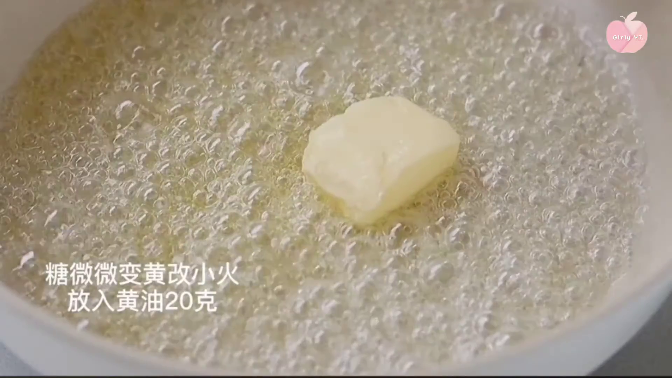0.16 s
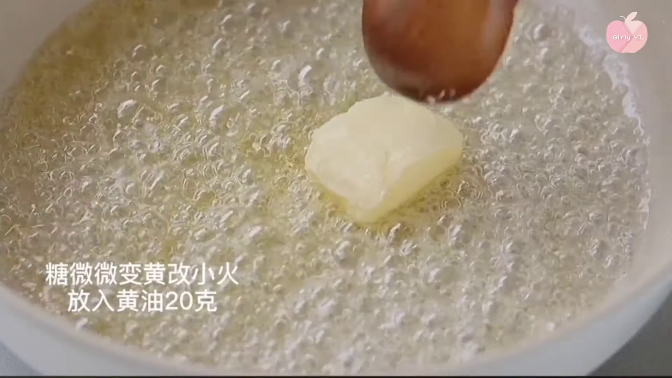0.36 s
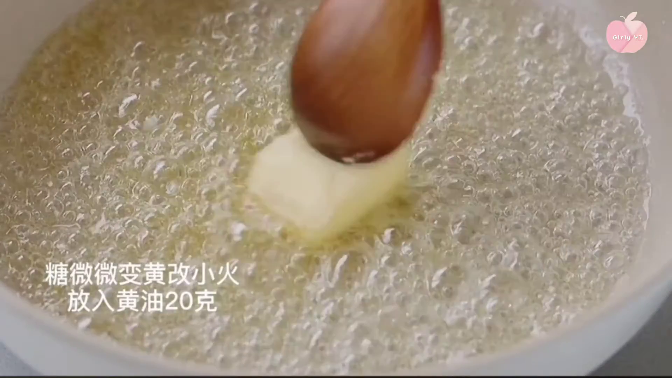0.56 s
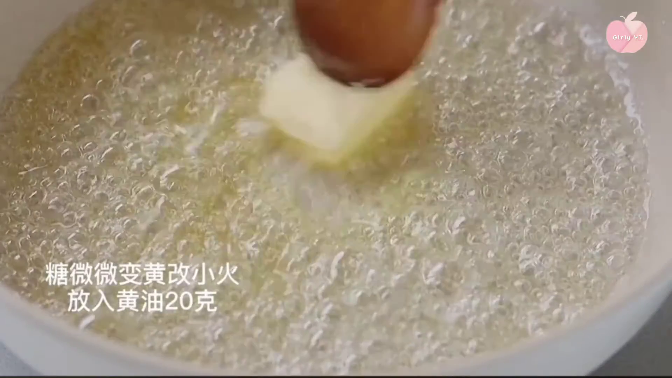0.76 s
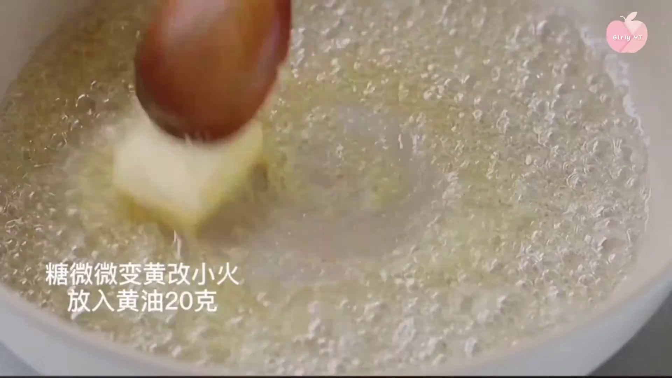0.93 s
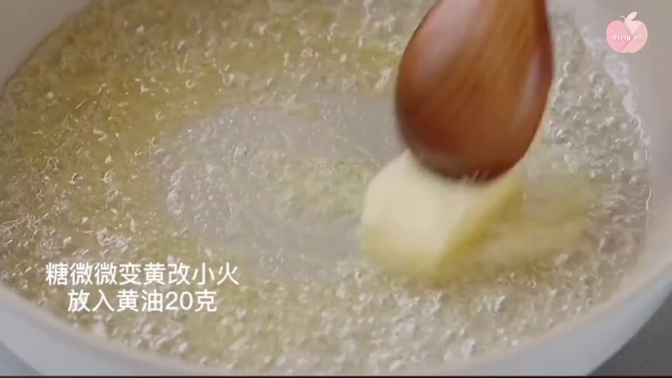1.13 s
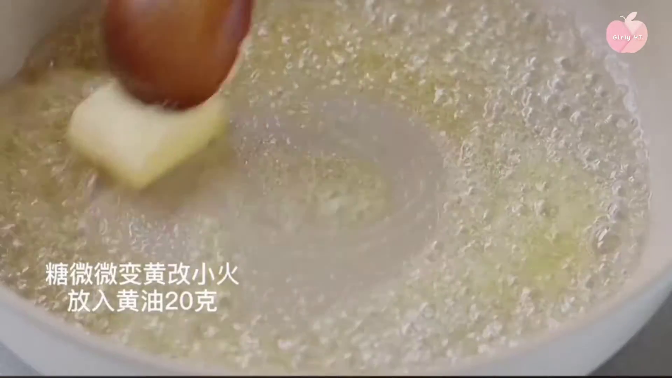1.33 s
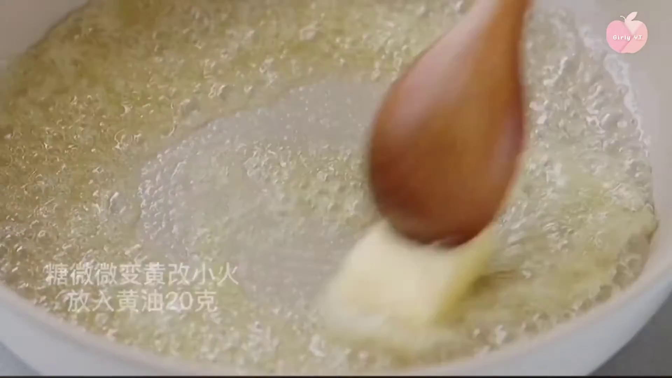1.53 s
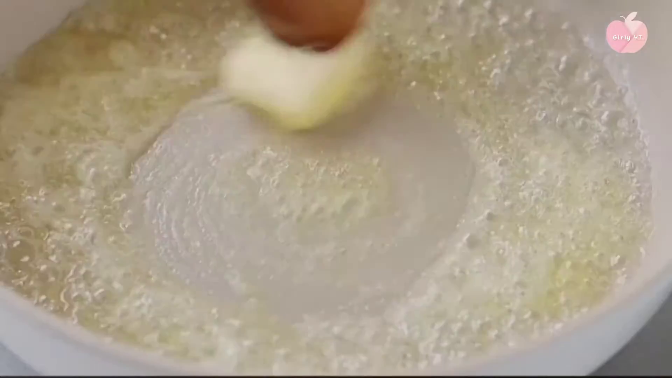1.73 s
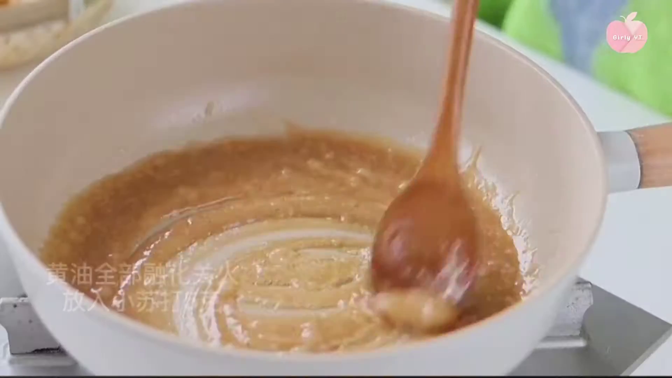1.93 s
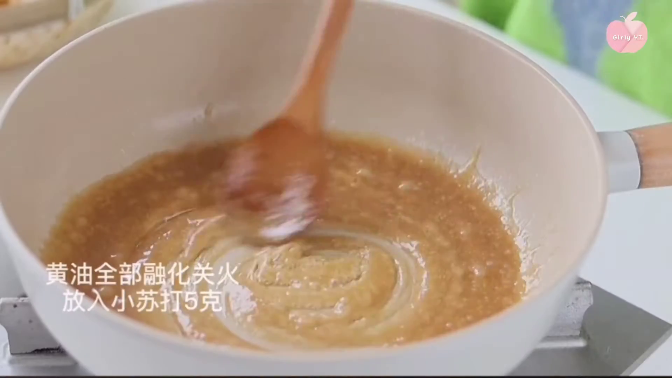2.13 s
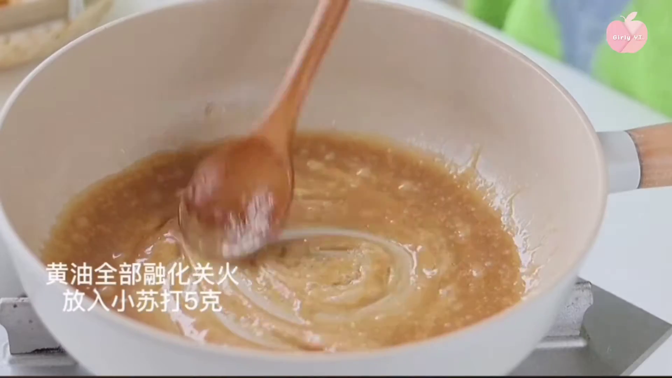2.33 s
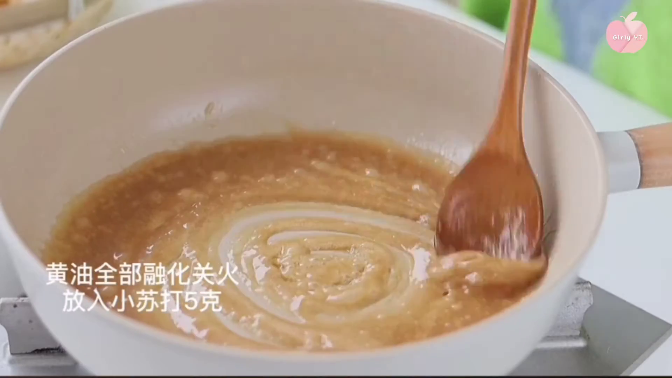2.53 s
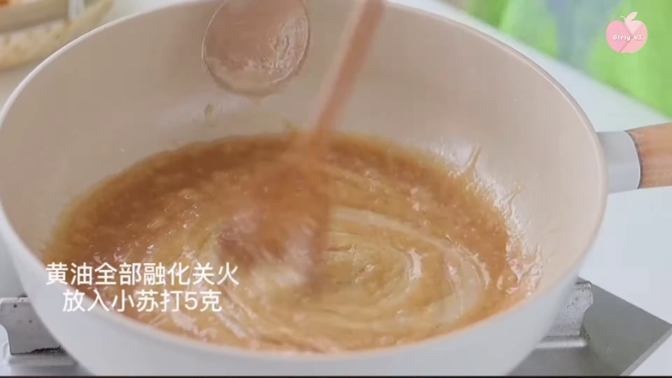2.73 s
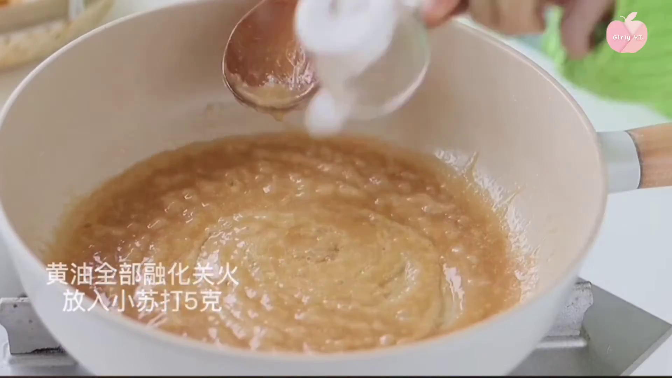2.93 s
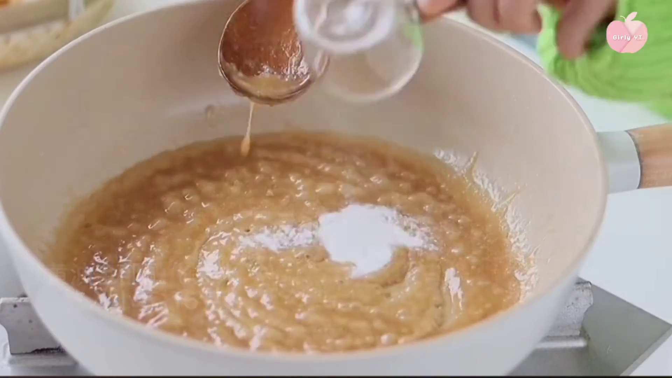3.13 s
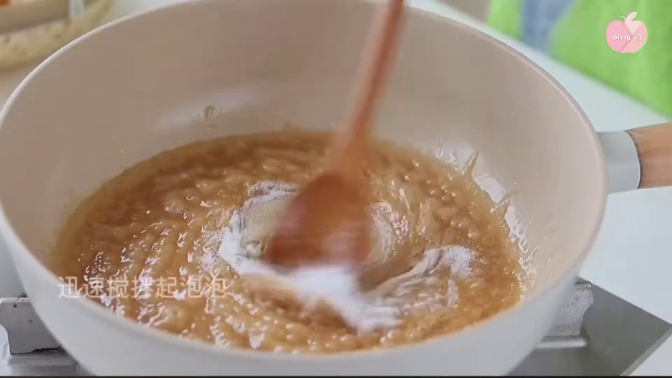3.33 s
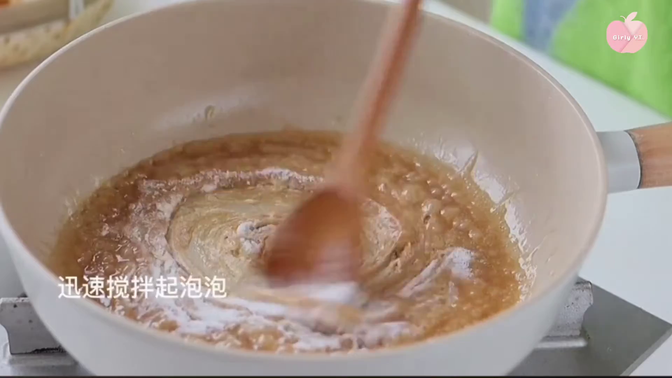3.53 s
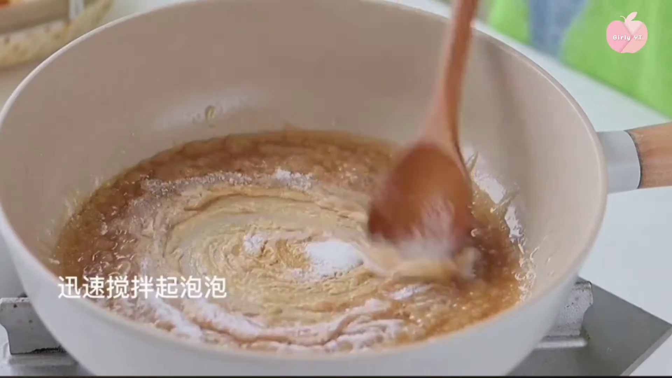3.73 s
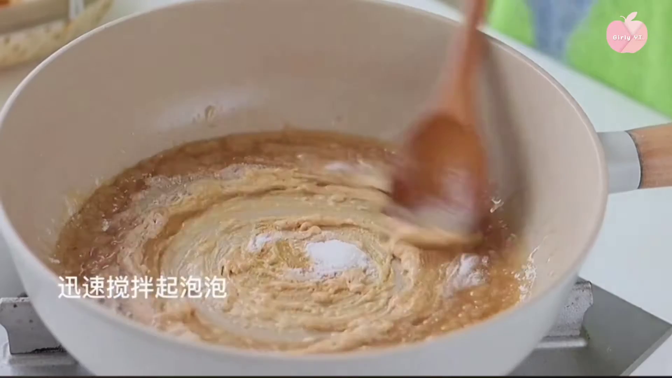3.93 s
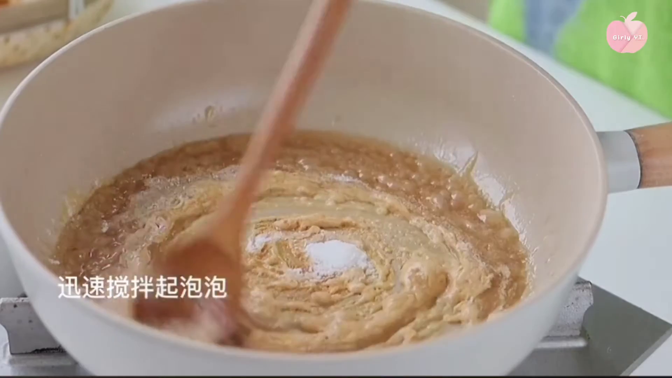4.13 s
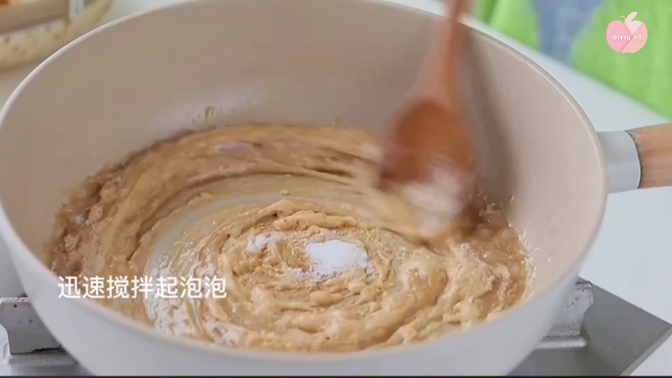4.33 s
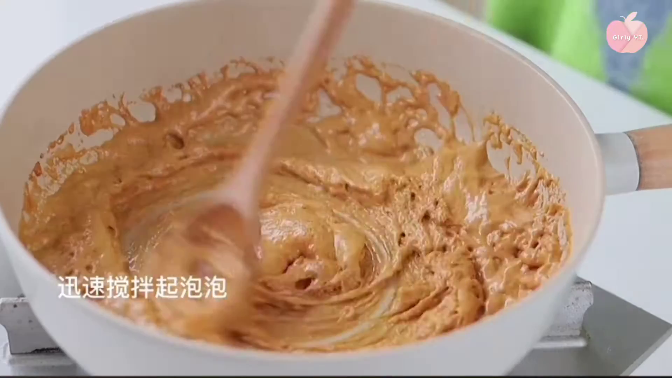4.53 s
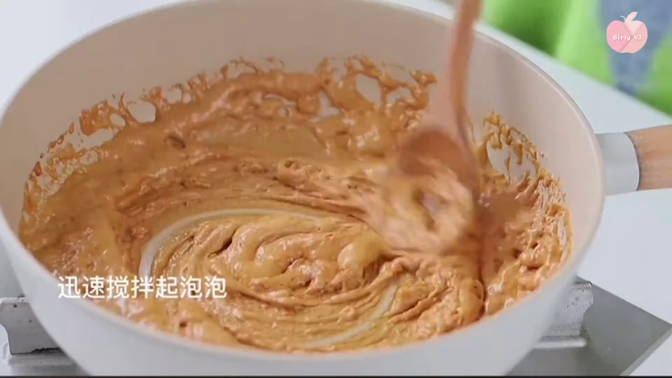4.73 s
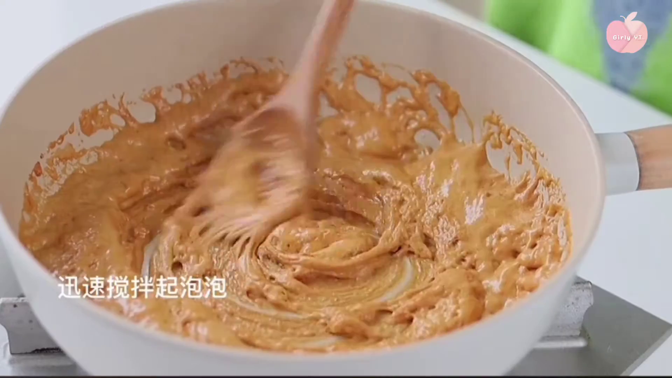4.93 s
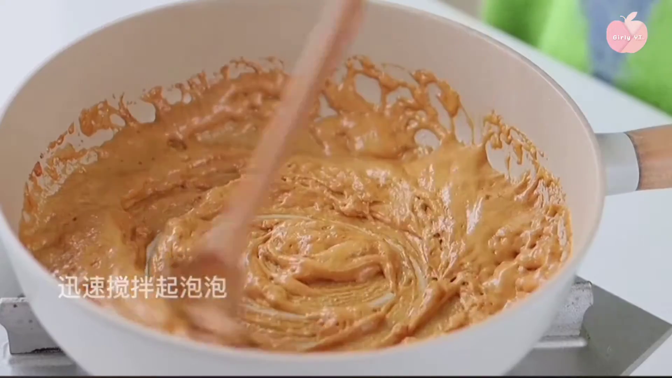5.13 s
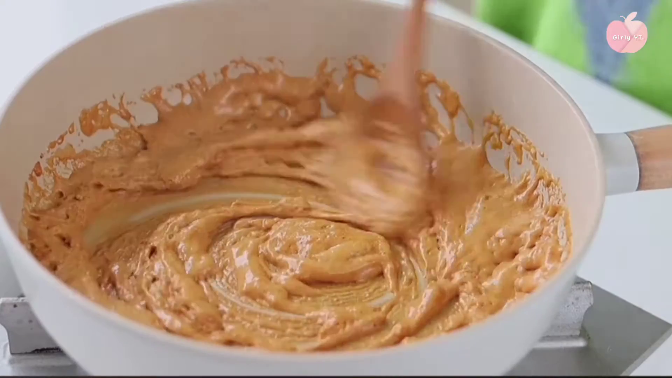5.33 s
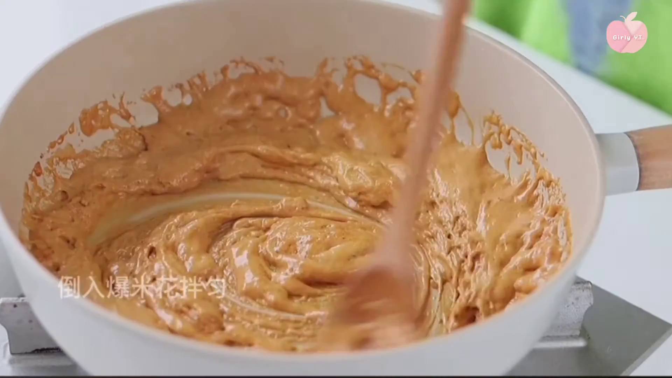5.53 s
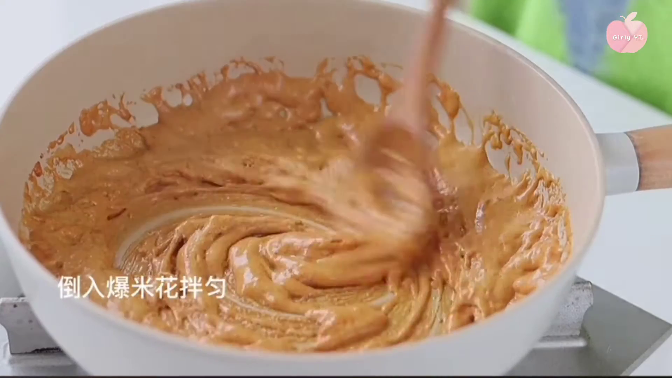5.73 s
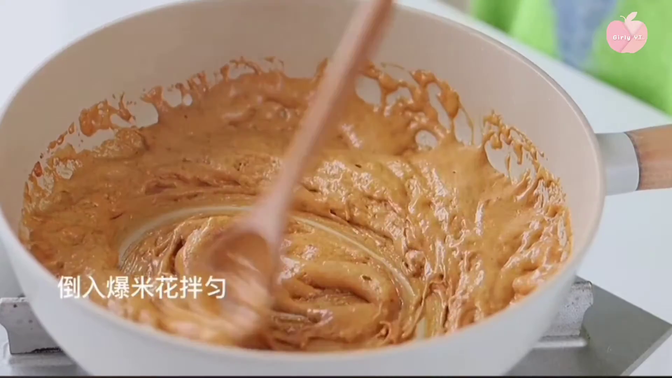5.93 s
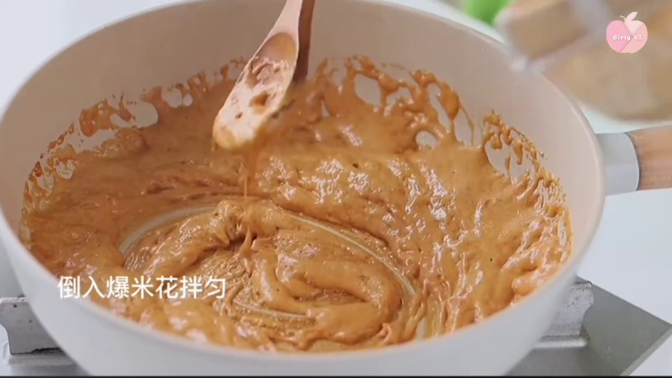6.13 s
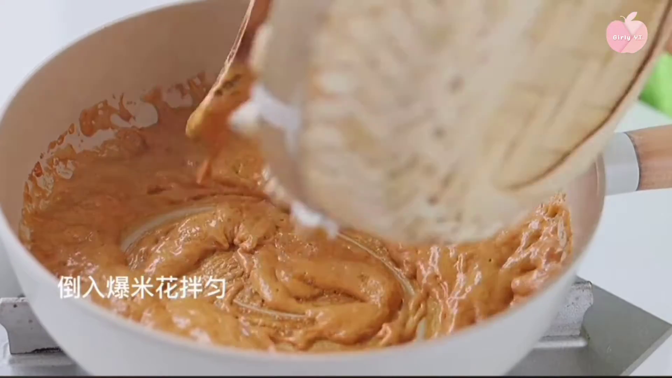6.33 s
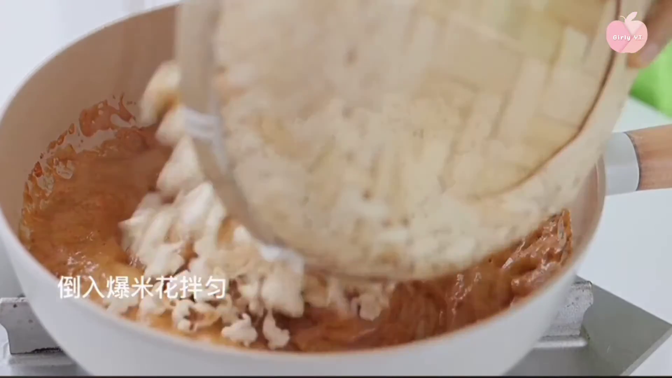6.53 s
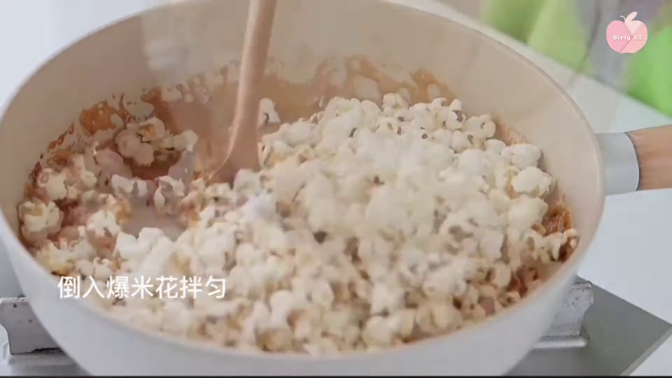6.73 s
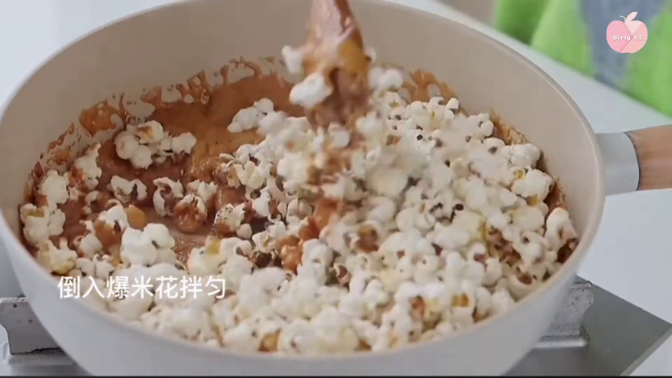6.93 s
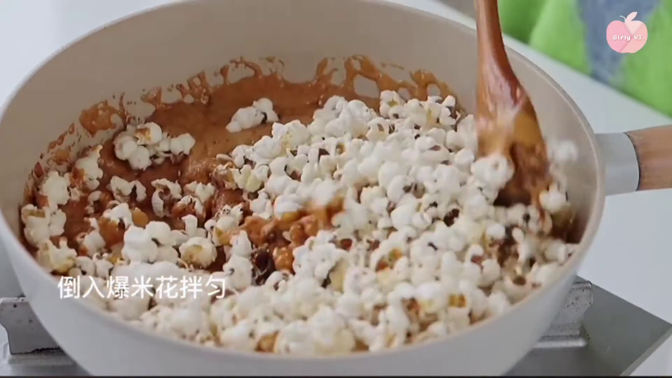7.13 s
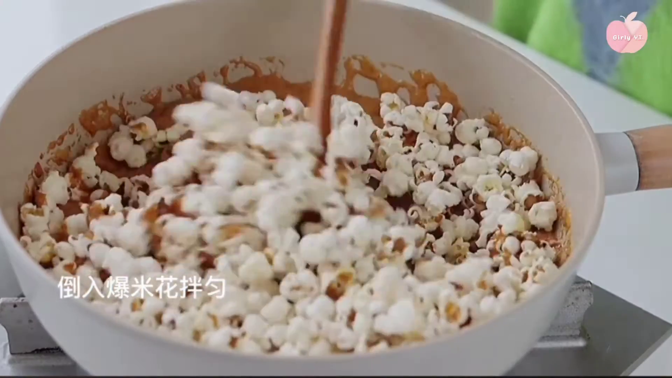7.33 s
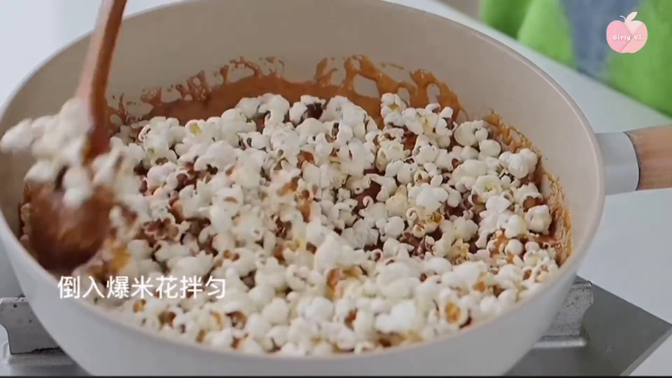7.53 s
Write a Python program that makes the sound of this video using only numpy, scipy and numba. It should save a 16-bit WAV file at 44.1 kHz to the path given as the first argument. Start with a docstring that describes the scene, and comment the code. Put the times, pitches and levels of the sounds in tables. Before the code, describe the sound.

Close kitchen sounds: faint bubbling, a bright butter sizzle cut short, brisk wooden spoon scrapes and taps, then dry popcorn tumbling into the pan.

```python
"""Caramel is cooked in an enamelled pan in a quiet kitchen, heard from close by.
First sugar bubbles swell, a wooden spoon rubs and knocks, and butter sizzles, gulps, then stops short.
Next the spoon scrapes in many short strokes, with a faint squeak near the end; then popcorn is tipped
in with a rush and stirred. A faint simmer, room noise, microphone hiss and a hum lie below.
Clicks that set tones ringing make the sizzle, strokes, popcorn and simmer; decaying sines with noise
make spits, knocks and kernels, sinking sines the gulps; the squeak glides, the room is noise with a hum."""
import sys
import numpy as np
from scipy import signal
from scipy.fft import rfft, irfft
from scipy.io import wavfile
from numba import njit

SR = 44100
rng = np.random.default_rng(int(sys.argv[2]) if len(sys.argv) > 2 else 0)


def master(y):
    """Save y as 16-bit WAV."""
    cut = np.clip(np.atleast_2d(y).T, -1, 1)
    pcm = np.round(cut * 32767)  # scale
    wavfile.write(sys.argv[1], SR, pcm.astype(np.int16))


N = 338688  # length in samples
SPLIT_HZ = 3400  # border between the low and the high part of a grainy sound


# Butter pushed round in the sugar. Each row: time in seconds, large bubbles in dB, fine spit in dB.
SIZZLE_LEVELS = [(.77, -72, -65), (.8, -53.5, -52.5), (.88, -56, -45), (1.0, -41.5, -46.5),
                 (1.06, -49, -44), (1.22, -50.5, -45.5), (1.28, -44.5, -41), (1.53, -51, -44.5),
                 (2.0, -52.5, -46)]
# First flares of the butter. Each row: bite (loudest moment) in seconds, swell before it in seconds,
# hold after it in seconds, large bubbles in dB, fine spit in dB.
BUTTER_FLARES = [(.01, 0.072, 0.19, -55, -61.5), (.5, 0.015, .08, -74, -67), (.74, 0.11, 0.011, -74, -64)]
# Colour of the sizzle. Each row: pitch in Hz, relative level in dB per Hz.
SIZZLE_COLOUR = [(290, -8), (500, -61), (1200, -22), (1650, -7), (2070, 4), (2540, 0.5), (3150, -4),
                 (3680, -3), (4700, -13), (8980, 3.5), (11600, -6.5), (15500, -39)]
# Bare patch of pan under the foam. Each row: pitch in Hz, spread in Hz (a wider one rings shorter),
# relative level in dB.
BARE_PAN_NOTES = [(1200, 120, 3), (2080, 140, 11)]
# Butter dragged over the bared pan. Each row: time in seconds, level in dB before a 4 dB cut.
DRAG_LEVELS = [(0.8, -61), (0.896, -51.5), (2.0, -58)]
# The two upper bands that sing in the drag. Each row: pitch in Hz, width in Hz.
DRAG_SINGING = [(3600, 120), (4350, 140)]


def sizzle():
    """Thousands of bursting bubbles a second, some notes of the bared pan standing out."""
    bubbles = random_clicks(9000, spread_db=2.2, clump_db=1.2, clump_rate=25)
    low, high = grains(bubbles, SIZZLE_COLOUR, cycles=24.0, wide=0.67, pan_db=-11.5)
    notes = np.zeros(N)
    for hz, spread_hz, db in BARE_PAN_NOTES:
        note = rms_one(ring(bubbles, hz, 4.9 / spread_hz))
        notes += amp(db + 1.4 * drift(4.5)) * note
    drag = np.zeros(N)
    for hz, width_hz in DRAG_SINGING:
        band = rms_one(ring(bubbles, hz, ring_time(width_hz)))
        drag += amp(6.4 * drift(4.8)) * band
    large, fine = gains([SIZZLE_LEVELS]) + bursts(BUTTER_FLARES)[0]
    bubbling = large * rms_one(low + amp(-6.5) * rms_one(notes))
    dragging = gains([DRAG_LEVELS])[0] * amp(-4.0) * rms_one(drag)
    return bubbling + fine * high + dragging


# Large bubbles gulping out from under the butter. Each row: start in seconds, level in dB before
# swell and froth, starting pitch in Hz, time to die by 60 dB in seconds.
BUBBLE_GULPS = [(1.12, -24.5, 1166, 0.047), (1.122, -28.5, 586, 0.089), (1.132, -25.5, 1030, 0.048),
                (1.141, -28.5, 795, 0.12), (1.157, -29.5, 1150, 0.063), (1.176, -33, 772, 0.097)]


def gulps():
    """Each bubble swells softly and sinks in pitch as it dies, roughened by froth."""
    rise_s, sag_per_s, froth_db = .005, 1.2, -2  # sag: share of the starting pitch lost per second
    t = np.arange(SR // 5) / SR
    froth = 1 + amp(froth_db) * drift(230)
    out = np.zeros(N)
    for s, db, hz, t60 in BUBBLE_GULPS:
        i = round(s * SR)
        swell = np.minimum(t / rise_s, 1) ** 2
        sinking = np.sin(2 * np.pi * hz * (t - sag_per_s * t ** 2 / 2))
        out[i:i + len(t)] += swell * amp(db - 60 * t / t60) * sinking
    return out * froth


# Lone spits. Each row: start in seconds, level in dB, pitch in Hz.
LONE_SPITS = [(.358, -52, 10700), (.4857, -51, 9200), (0.5526, -32, 10800), (0.5644, -38, 6770),
              (.658, -50, 6750), (0.7093, -46, 9500), (.7296, -45, 5460), (0.792, -37, 6350),
              (4.3974, -34, 9500), (4.452, -36, 8500), (4.8676, -39, 7740), (5.1816, -41, 6960),
              (6.2861, -50, 6950)]


def spits():
    """Single spits, each a short high ring over a broad snap."""
    return pops(LONE_SPITS, cycles=30.0, rise_s=.0008, snap_db=-25)


# Spoon strokes along the bottom; the first three rows are swells of bubbling sugar.
# Each row: bite (loudest moment) in seconds, swell before it in seconds, hold after it in seconds,
# rub (the low part) in dB, grit (the high part) in dB, main tone in Hz.
SPOON_STROKES = [(0.012, 0.079, 0.061, -59, -63.5, 1730), (0.115, 0.037, 0.048, -47.5, -88, 3050),
                 (0.431, 0.059, 0.024, -54, -86, 1750), (0.51, 0.03, 0.21, -54.5, -70.5, 1560),
                 (0.651, 0.13, 0.18, -50, -69, 1600), (3.428, 0.021, 0.13, -50, -66.5, 990),
                 (3.507, 0.015, 0.037, -44.5, -58, 990), (3.563, 0.022, 0.042, -48.5, -57, 1230),
                 (3.625, 0.044, 0.034, -53, -72, 1000), (3.759, 0.014, 0.037, -54, -52, 900),
                 (3.808, 0.059, 0.016, -38, -48.5, 1150), (3.858, 0.035, 0.064, -52.5, -61, 1130),
                 (3.962, 0.078, 0.14, -58, -70, 940), (4.039, 0.026, 0.042, -54, -61, 1500),
                 (4.204, 0.021, 0.057, -39, -50.5, 1200), (4.306, 0.017, 0.049, -43.5, -65.5, 1014),
                 (4.378, .02, 0.051, -60, -66, 1590), (4.585, 0.012, 0.048, -38, -56.5, 1590),
                 (4.69, 0.069, 0.037, -57.5, -77, 1100), (4.751, 0.016, 0.028, -52, -65, 2120),
                 (4.869, 0.025, 0.045, -56.5, -58.5, 1340), (5.375, 0.025, 0.026, -45, -67, 1960),
                 (5.496, 0.012, 0.027, -52, -69, 1200)]
# Colour of the strokes. Each row: pitch in Hz, relative level in dB per Hz.
STROKE_COLOUR = [(450, -61), (860, -29), (1170, -6.5), (1760, -9.5), (2700, -9), (4780, -35.5), (7200, -26),
                 (12000, -29.5), (14000, -49)]
# Bands that sing in every stroke. Each row: pitch in Hz, width in Hz, relative level in dB.
SPOON_BANDS = [(1760, 80, -3.5), (2550, 130, -10), (3390, 130, -14), (4350, 33, -10), (5560, 34, -11.5),
               (6570, 180, -5), (7240, 62, -9)]
# How clearly the spoon's bands sing; the froth from the soda smothers them.
# Each row: time in seconds, change of the bands in dB.
BAND_CLARITY = [(3.95, -2), (4.1, -12)]


def strokes():
    """Stick-slip of wood on enamel: dense uneven clicks make the pan sing; the sugar swells share the method."""
    (rub, grit), stroke = bursts(np.array(SPOON_STROKES)[:, :-1])
    tone_hz = np.array(SPOON_STROKES)[stroke, -1]
    slips = random_clicks(5000, spread_db=1.0, clump_db=2.5, clump_rate=35)
    low, high = grains(slips, STROKE_COLOUR, cycles=23.0, wide=0.008, pan_db=-3)
    turn = 2 * np.pi * tone_hz / SR
    r = np.exp(-np.pi * 260 / SR)  # each resonance is 260 Hz wide
    # Twice: a clear band with dark flanks.
    tone = rms_one(gliding(gliding(slips, turn, r), turn, r))
    clear_db = np.interp(np.arange(N) / SR, *np.transpose(BAND_CLARITY))
    for hz, width_hz, db in SPOON_BANDS:
        singing = rms_one(ring(slips, hz, ring_time(width_hz)))
        band = amp(db + clear_db + 2.5 * drift(10)) * singing
        if hz > SPLIT_HZ:
            high = high + band
        else:
            low = low + band
    rubbing = rub * rms_one(low + amp(0.5) * tone)
    return dull(rubbing + grit * rms_one(high))


# Wet spoon slipping. One row: start in seconds, length in seconds, middle level in dB,
# first pitch in Hz, last pitch in Hz.
SPOON_SQUEAK = (5.86, .12, -62, 1170, 1070)


def squeak():
    """A faint wavering note that slides down as the wet spoon slips."""
    s, length_s, db, first_hz, last_hz = SPOON_SQUEAK
    part = np.clip((np.arange(N) / SR - s) / length_s, 0, 1)
    hz = first_hz + (last_hz - first_hz) * part + 40 * drift(40)
    level = amp(db + 4 * drift(40)) * np.sin(np.pi * part)
    return level * np.sin(2 * np.pi * np.cumsum(hz) / SR)


# Spoon knocks. Each row: start in seconds, level in dB, spoon pitch in Hz, time for the spoon to die
# by 60 dB in seconds, fading time of the contact in milliseconds, then pan ring and crack in dB
# relative to the level.
SPOON_KNOCKS = [(.282, -47.5, 1550, 0.017, 1.8, -11, -1), (.485, -48, 1323, 0.025, 0.74, -7, -11),
                (3.632, -43, 1720, 0.043, 8.1, -21, -22), (3.65, -39.5, 750, 0.053, 20, -29, -30),
                (4.049, -43, 1090, 0.024, 0.63, -15, 1), (4.21, -32, 893, 0.051, 5.8, 3.5, 13),
                (4.582, -38, 2017, 0.026, 7.7, 0.5, 12.5), (4.743, -54, 2090, 0.031, 9.5, -1, 12),
                (5.373, -36, 1830, 0.052, 2.9, -15.5, -22), (6.083, -36, 795, 0.013, 0.31, -28, -19),
                (7.185, -46, 1317, 0.12, 3.5, -28, -28), (7.407, -24.5, 1302, 0.085, 0.13, -26, 10),
                (7.572, -43.5, 1310, 0.08, 2.7, -14, 7)]


def knocks():
    """Wood note and pan modes with new strengths each blow, driven by a chattering contact, plus a short crack."""
    out, t = np.zeros(N), np.arange(SR // 3) / SR
    for s, db, hz, t60, contact_ms, pan_db, crack_db in SPOON_KNOCKS:
        i = round(s * SR)
        wood = np.sin(2 * np.pi * hz * t) * amp(-60 * t / max(t60, .005))
        metal = np.zeros(len(t))
        chances_db = rng.normal(0, 1.0, len(PAN_MODES))
        for (mode_hz, mode_db, mode_t60), chance_db in zip(PAN_MODES, chances_db):
            fade = amp(pan_db + mode_db + chance_db - 60 * t / mode_t60)
            metal += fade * np.sin(2 * np.pi * mode_hz * t)
        chatter = np.abs(rng.standard_normal(len(t)) ** 3) * np.exp(-1000 * t / max(contact_ms, .05))
        chatter[0] = np.linalg.norm(chatter)  # the first touch stands out
        # How hard the contact drives the wood note.
        drive = abs(np.sum(chatter * np.exp(-2j * np.pi * hz * t)))
        body = wood / drive + metal / np.linalg.norm(chatter)
        blow = signal.fftconvolve(body, chatter)[:len(t)]
        snap = np.sin(2 * np.pi * 2400 * t) * amp(-60 * t / 0.0063)
        splinter = rng.standard_normal(len(t)) * amp(-31 - 60 * t / 0.033)
        crack = amp(crack_db) * (snap + splinter)
        out[i:i + len(t)] += amp(db) * (blow + crack)[:N - i]
    return dull(out)


# Popcorn tipped in. Each row: time in seconds, tumbling in dB, rustle in dB.
POUR_LEVELS = [(6.47, -84, -77), (6.5, -54.5, -53), (6.55, -56, -59.5), (6.58, -51, -52.5),
               (6.655, -47, -50.5), (6.665, -37, -46), (6.72, -34.5, -47.5), (6.79, -32, -44),
               (6.83, -38, -46), (6.9, -43, -46.5), (7.145, -47, -55), (7.16, -64, -57)]
# Popcorn turned over. Each row: bite (loudest moment) in seconds, swell before it in seconds,
# hold after it in seconds, tumbling in dB, rustle in dB.
POPCORN_STIRS = [(7.18, 0.024, 0.011, -50, -74), (7.312, 0.02, 0.05, -46.5, -62.5),
                 (7.355, 0.067, 0.038, -44, -56.5), (7.43, .03, 0.065, -54, -67),
                 (7.51, 0.018, .05, -56.5, -80), (7.575, 0.027, 0.024, -53, -65)]
# Colour of the popcorn. Each row: pitch in Hz, relative level in dB per Hz.
POPCORN_COLOUR = [(240, -64), (400, -35), (535, 5.5), (683, -15), (886, -0.5), (1450, -2.5), (1760, 0.5),
                  (3210, -9), (4000, -14.5), (5400, -22.5), (9070, -12), (15500, -42)]


def popcorn():
    """Light dry kernels knocking against each other and the pan."""
    hits = random_clicks(2800, spread_db=2.6, clump_db=2.0, clump_rate=40)
    tumble_and_rustle = grains(hits, POPCORN_COLOUR, cycles=18.0, wide=0.58, pan_db=-23)
    levels = gains([POUR_LEVELS]) + bursts(POPCORN_STIRS)[0]
    return np.sum(levels * tumble_and_rustle, axis=0)


# Single kernels that stand out. Each row: start in seconds, level in dB, pitch in Hz.
LONE_KERNELS = [(6.5, -38, 3270), (6.578, -33.5, 3120), (6.6065, -28, 3160), (6.625, -35, 2700),
                (6.663, -27, 1510), (6.7234, -19.5, 1740), (6.764, -20.5, 1420), (6.8125, -23, 1740),
                (7.0224, -26.5, 2120), (7.1725, -41, 1500), (7.3104, -32, 1690), (7.3536, -25, 1580),
                (7.3694, -27, 1450), (7.509, -39, 2030), (7.517, -37, 1810), (7.551, -40, 1400),
                (7.5914, -36, 2000)]


def kernels():
    """Single popcorn kernels, each a few ringing cycles over a broad snap."""
    return dull(pops(LONE_KERNELS, cycles=15.5, rise_s=0.00026, snap_db=-21))


# Faint bubbling. Each row: time in seconds, bubbles in dB, hiss in dB.
SIMMER_LEVELS = [(0, -60, -95), (1.98, -55, -89), (2.02, -65, -79.5), (3.3, -64, -80.5), (7.68, -63, -81)]
# Colour of the simmer. Each row: pitch in Hz, relative level in dB per Hz.
SIMMER_COLOUR = [(600, -18.5), (1300, -2.5), (1750, 0), (2600, -12.5), (3500, -10), (4200, -24),
                 (7200, -11), (8900, -8), (13000, -50)]


def simmer():
    """Many small bubbles in the thick caramel merge into a soft hiss."""
    bubbles = random_clicks(6000, spread_db=3.0, clump_db=2.5, clump_rate=6.5)
    bubbles_and_hiss = grains(bubbles, SIMMER_COLOUR, cycles=25.0, wide=0.44, pan_db=-30)
    return np.sum(gains([SIMMER_LEVELS]) * bubbles_and_hiss, axis=0)


# Colour of the room noise and microphone hiss. Each row: pitch in Hz, relative level in dB per Hz.
BACKGROUND_COLOUR = [(12, 9.5), (25, -7.5), (119, 3.5), (170, 0.5), (835, -2.5), (1340, -7), (3450, -7),
                     (4830, -20.5), (8000, -24), (15500, -31)]


def background():
    """Steady room noise below and microphone hiss above, as one coloured noise, with a wavering hum."""
    noise_db, hum_hz, hum_db = -65, 101, -81.5
    hz = np.maximum(np.fft.rfftfreq(N, 1 / SR), 1)
    noise = rms_one(irfft(rfft(rng.standard_normal(N)) * amp(at_hz(BACKGROUND_COLOUR, hz)), N))
    waver, swell_db = 1.5 * drift(4), 2.5 * drift(3)  # waver: in radians
    hum = np.sin(2 * np.pi * hum_hz * np.arange(N) / SR + waver)
    return amp(noise_db) * noise + hum * amp(hum_db + swell_db)


def bowl(x):
    """Sound lingers in the deep pan and on the counter: a short tail shaped by dying noise."""
    t60, tail_db = .09, -14
    t = np.arange(SR // 4) / SR
    tail = rng.standard_normal(len(t)) * amp(-60 * t / t60) * (t > .0015)
    return x + amp(tail_db) * signal.fftconvolve(x, tail / np.linalg.norm(tail))[:N]


# Dips where the echo off the pan's rim cancels. Each row: pitch in Hz, width in Hz, depth in dB.
RIM_DIPS = [(8310, 155, -26.5), (9840, 900, -9)]


def rim(x):
    """Two narrow dips in the treble of the close sounds, where the echo off the pan's rim cancels."""
    for hz, width_hz, depth_db in RIM_DIPS:
        c, q = -2 * np.cos(2 * np.pi * hz / SR), np.pi * width_hz / SR
        g = amp(depth_db / 2)
        x = signal.lfilter([1 + q * g, c, 1 - q * g], [1 + q / g, c, 1 - q / g], x)
    return x


def dull(x):
    """A low-pass that softens the top of strokes, knocks and kernels."""
    return signal.sosfilt(signal.butter(4, 9500, fs=SR, output="sos"), x)


# Ringing modes of the pan. Each row: pitch in Hz, relative level in dB,
# time to die by 60 dB in seconds when the pan rings freely (knocks only).
PAN_MODES = [(574, 0.5, 0.052), (921, 0, 0.15), (1150, -20, 0.18), (1610, -9, 0.1), (1720, 4.5, 0.054),
             (2053, -1, 0.11), (2700, -9, 0.07), (3070, -14, 0.086), (3620, -41, 0.021),
             (3690, -11.5, 0.12), (4420, -14.5, 0.022), (4550, -19, 0.051), (5440, -14.5, 0.069),
             (6770, -11.5, 0.037), (7360, -9, 0.037), (7820, -11.5, 0.06)]


def pan(blows):
    """The pan's modes under dense small blows: contents cut every ring short, light touches favour the upper modes."""
    t60, tilt_db = .03, 5  # tilt: per octave
    return sum(amp(db + tilt_db * np.log2(hz)) * ring(blows, hz, t60) for hz, db, free_t60 in PAN_MODES)


def grains(train, colour, cycles, wide, pan_db):
    """Each click rings some cycles at its own pitch, partly at all pitches, and shakes the pan.
    Returns the low and the high part, rms 1 each."""
    count = 30
    patches = [drift(5.1) for band in range(10)]  # regions of pitch swell and fade on their own
    dealt, out = rng.integers(0, count, N), np.zeros((2, N))
    for k, hz in enumerate(np.geomspace(colour[0][0], colour[-1][0], count)):
        share = (dealt == k) + wide * (-1) ** k
        rung = ring(train * share, hz, cycles / hz)
        level = amp(at_hz(colour, hz) + 2.0 * patches[k // 3]) * np.sqrt(hz)  # root: bands widen with pitch
        out[int(hz > SPLIT_HZ)] += rms_one(rung) * level
    parts = []
    for part, side in zip(out, ("low", "high")):
        split = signal.butter(4, SPLIT_HZ, side, fs=SR, output="sos")
        metal = signal.sosfilt(split, pan(train))
        parts.append(rms_one(rms_one(part) + amp(pan_db) * rms_one(metal)))
    return np.array(parts)


def random_clicks(per_s, spread_db, clump_db, clump_rate):
    """Random clicks of uneven size, coming in clumps."""
    luck = np.minimum(rng.exponential(1, N), 5)
    sizes = amp(spread_db * luck) * rng.choice([-1, 1], N)
    return sizes * (rng.random(N) < per_s * amp(clump_db * drift(clump_rate)) / SR)


def pops(rows, cycles, rise_s, snap_db):
    """Lone clicks: each note dies by 60 dB in the given cycles, over a broad snap of noise."""
    out, t = np.zeros(N), np.arange(SR // 20) / SR
    for s, db, hz in rows:
        i, turns = round(s * SR), t * hz
        note = amp(-60 * turns / cycles) * np.sin(2 * np.pi * turns) * np.minimum(t / rise_s, 1)
        snap = amp(snap_db - 60 * t / 0.0033) * rng.standard_normal(len(t))
        out[i:i + len(t)] += amp(db) * (note + snap)[:N - i]
    return out


def bursts(rows):
    """Gains of the two dB columns for bursts that swell to a bite, sag while they hold, then stop short.
    Also tells which burst is loudest at each moment."""
    swell_db, sag_db, fall_db_per_s = 17, 4.5, 704
    t, best, loudest = np.arange(N) / SR, np.full((2, N), -200.), np.zeros(N, int)
    for k, (s, swell_s, hold_s, low_db, high_db) in enumerate(rows):
        near = slice(max(int((s - 3 * swell_s) * SR), 0), int((s + hold_s + .1) * SR))
        late = t[near] - s
        sag = sag_db * np.minimum(late / hold_s, 1)
        fall = fall_db_per_s * np.maximum(late - hold_s, 0)
        shape_db = np.where(late < 0, swell_db * late / swell_s, -sag - fall)
        loudest[near][low_db + shape_db > best[0, near]] = k
        best[:, near] = np.maximum(best[:, near], [low_db + shape_db, high_db + shape_db])
    return amp(best), loudest


def ring(clicks, hz, t60):
    """A unit click sets a sine of height 1 ringing, which dies by 60 dB in t60 seconds."""
    r, w = amp(-60 / (t60 * SR)), 2 * np.pi * hz / SR
    return signal.lfilter([0, np.sin(w)], [1, -2 * r * np.cos(w), r * r], clicks + 1e-18)


def ring_time(width_hz):
    """Seconds in which a resonance of this width dies by 60 dB."""
    return np.log(1000) / (np.pi * width_hz)


@njit
def gliding(x, turn, r):
    """A resonance whose centre moves sample by sample."""
    y = np.zeros(len(x))
    for n in range(2, len(x)):
        y[n] = np.sin(turn[n]) * x[n - 1] + 2 * r * np.cos(turn[n]) * y[n - 1] - r * r * y[n - 2]
    return y


def drift(rate):
    """Random wander of spread 1: noise smoothed to keep what is slower than the rate in Hz."""
    r = np.exp(-80 * np.pi * rate / SR)  # computed at every 40th sample
    slow = signal.lfilter([1], [1, -2 * r, r * r], rng.standard_normal(N // 40 + 2002))[2000:]
    return np.interp(np.arange(N) / 40, np.arange(len(slow)), rms_one(slow))


def gains(tables):
    """Gain curves of dB columns, silent outside the tables' times."""
    return amp(columns(tables, [-200] * (len(tables[0][0]) - 1)))


def columns(tables, outside):
    """The tables' columns in time, with the given values outside the tables' times."""
    t, out = np.arange(N) / SR, np.outer(outside, np.ones(N))
    for rows in tables:
        s, *values = np.transpose(rows)
        inside = (t >= s[0]) & (t <= s[-1])
        out[:, inside] = [np.interp(t[inside], s, v) for v in values]
    return out


def at_hz(points, hz):
    """A spectrum read on a log-frequency axis."""
    return np.interp(np.log(hz), np.log(np.array(points)[:, 0]), np.array(points)[:, 1])


def rms_one(x):
    """Scaled to rms 1."""
    return x / np.sqrt(np.mean(x ** 2) + 1e-20)


def amp(db):
    """Gain of a level in dB."""
    return 10 ** (np.asarray(db) / 20)


def scene():
    """All sources near one microphone; such small things radiate no bass."""
    butter = sizzle() + gulps() + spits()
    spoon = strokes() + squeak() + knocks()
    corn = popcorn() + kernels()
    close = rim(bowl(butter + spoon + corn + simmer()))
    bass_cut = signal.butter(4, 870, "high", fs=SR, output="sos")
    return (signal.sosfilt(bass_cut, close) + background())[None]


def record(dry):
    """The top is cut steeply: from about 16 kHz up it is at least 60 dB down."""
    return signal.sosfilt(signal.cheby2(14, 60, 16014, fs=SR, output="sos"), dry)


dry = scene()
out = record(dry)
master(out)
```